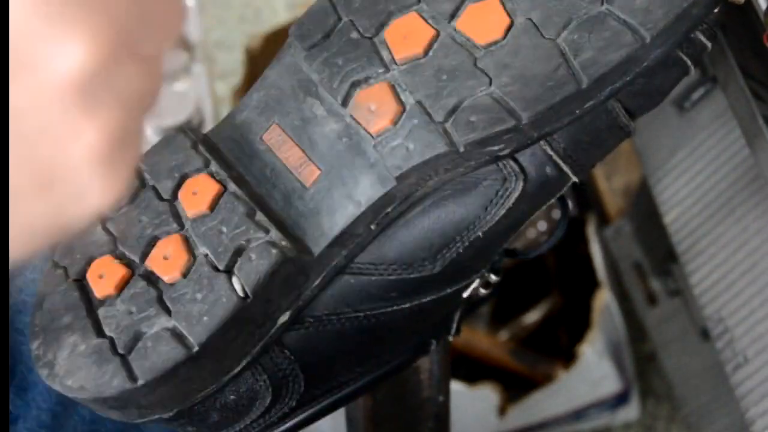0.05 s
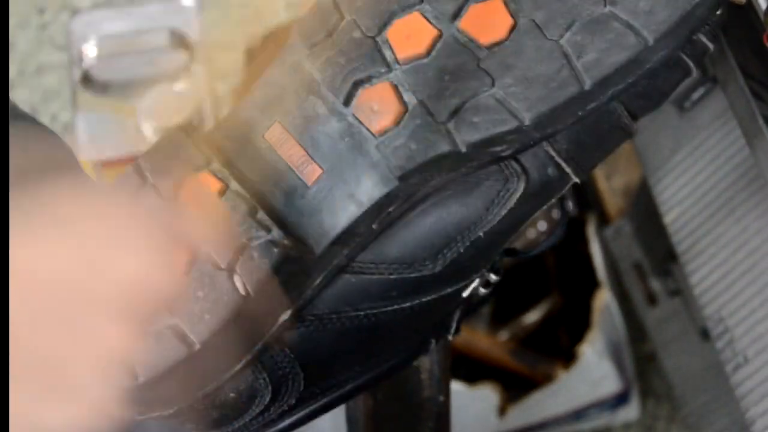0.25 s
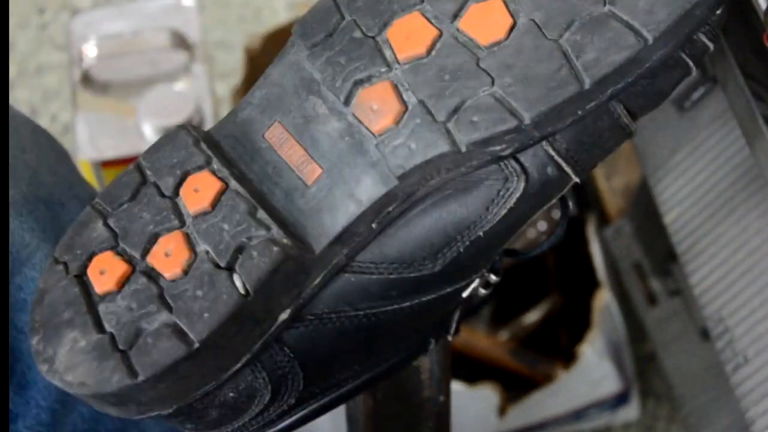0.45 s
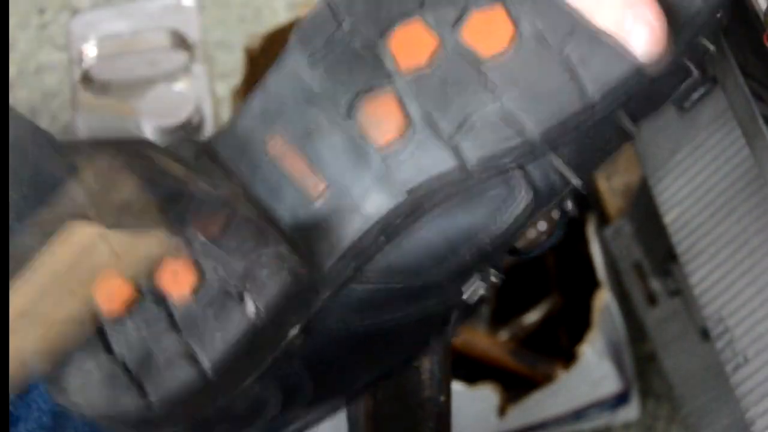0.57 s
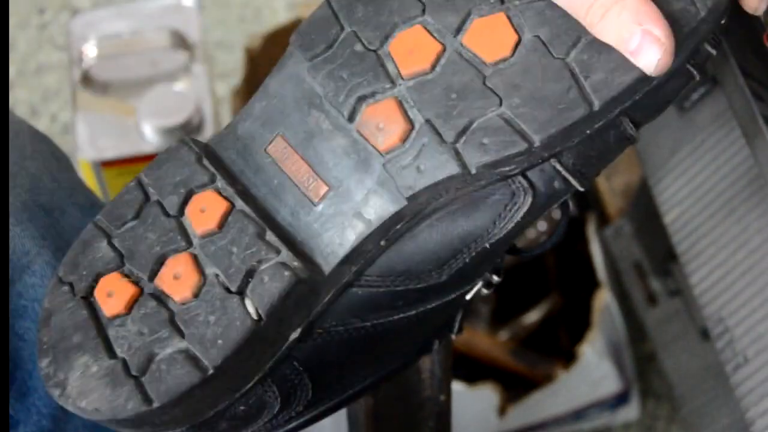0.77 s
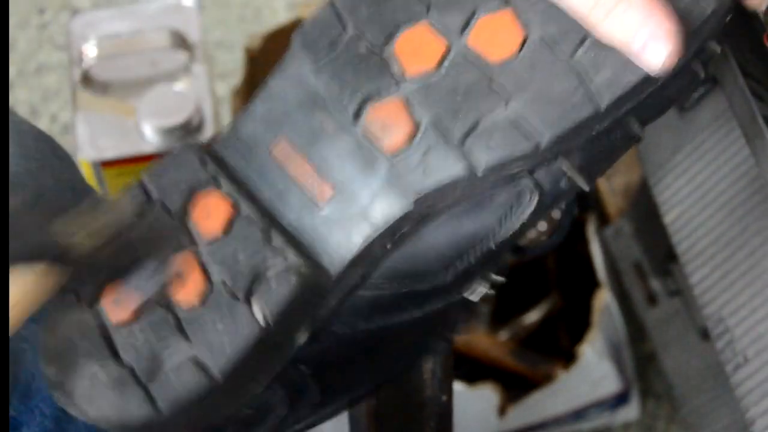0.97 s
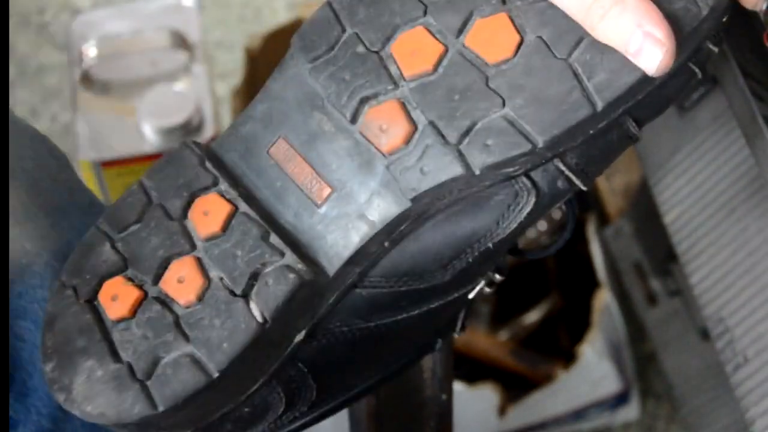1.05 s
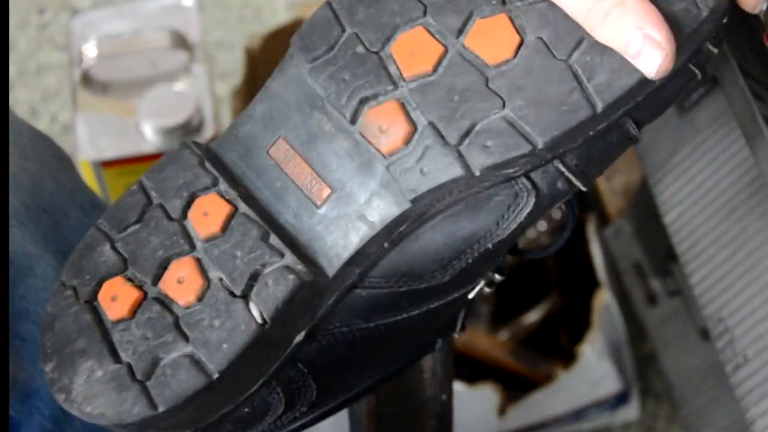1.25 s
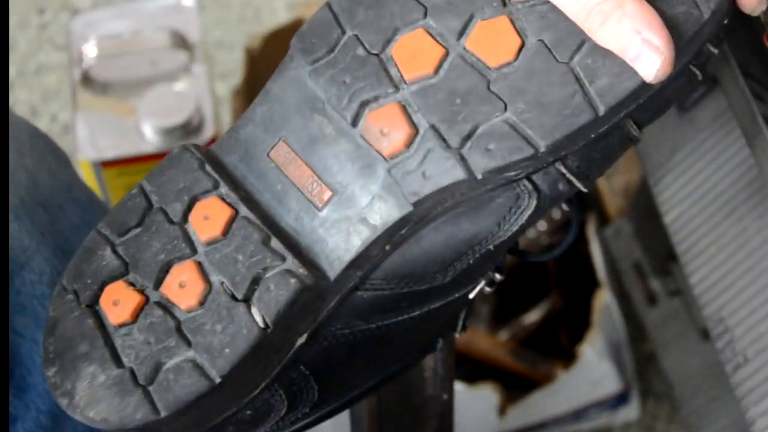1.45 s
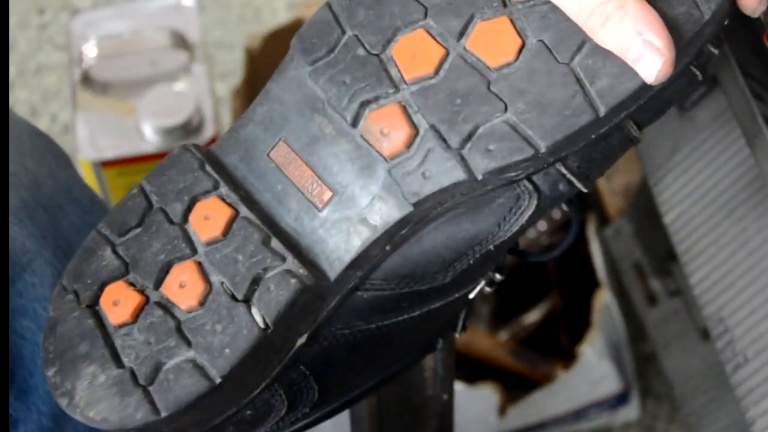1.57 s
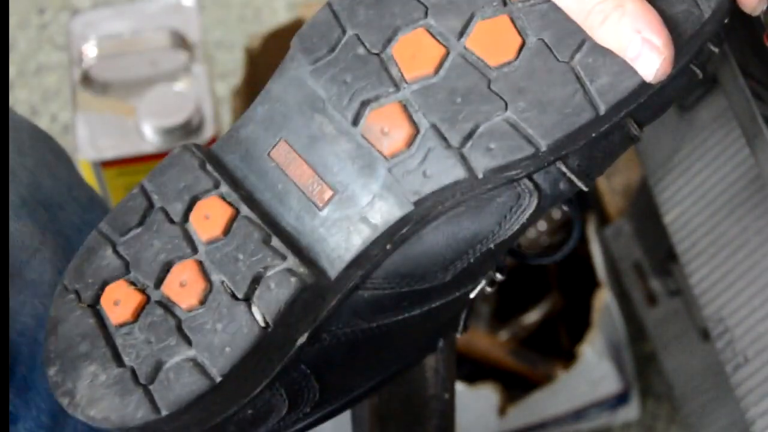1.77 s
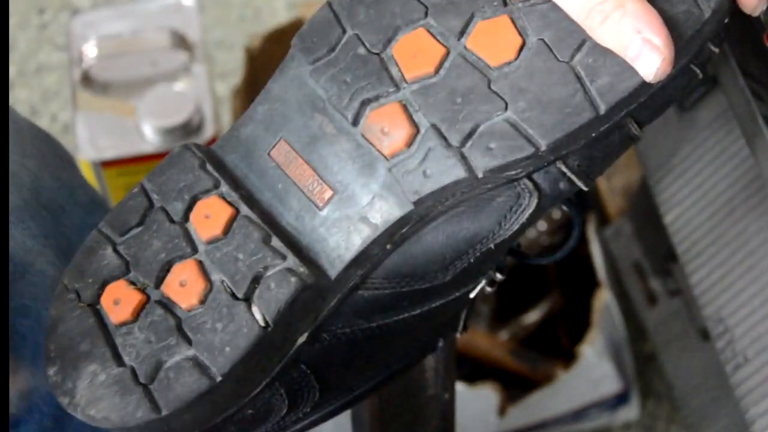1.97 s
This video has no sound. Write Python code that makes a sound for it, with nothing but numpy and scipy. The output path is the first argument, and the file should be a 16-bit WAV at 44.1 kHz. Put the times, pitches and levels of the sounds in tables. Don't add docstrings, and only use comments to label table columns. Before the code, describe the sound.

Hammer blows on a rubber boot sole, five hard clipped knocks in a small shop

```python
import sys
import numpy as np
from scipy import signal
from scipy.io import wavfile
from scipy.ndimage import uniform_filter1d

SR = 44100
rng = np.random.default_rng(int(sys.argv[2]) if len(sys.argv) > 2 else 0)


def wrap_up_sound(samples):
    columns = np.atleast_2d(samples).T
    tamed = np.clip(columns, -1, 1)
    steps = np.round(tamed * 32767).astype(np.int16)
    wavfile.write(sys.argv[1], SR, steps)


def linear_from_db(decibels):
    return 10 ** (np.asarray(decibels, float) / 20)


N = 88200
LEAD = 8820


def evened(x):
    return x / np.sqrt(np.mean(x ** 2) + 1e-20)


def read(points, hz):
    f, value = np.transpose(points)
    return np.interp(np.log(hz + 1), np.log(f + 1), value)


def bump(hz, rows):
    return sum(db * np.exp(-.5 * ((hz - f) / width) ** 2) for f, width, db in rows)


def add(mix, start_s, sound):
    part = mix[LEAD + round(start_s * SR):][:len(sound)]
    part += sound[:len(part)]


def ring(hz, db, t60_s, rise_s, lag_s=0):
    t = np.maximum(np.arange(8000) / SR - lag_s, 0)
    envelope = linear_from_db(db - 60 * t / t60_s) * (1 - np.exp(-t / rise_s))
    return envelope * np.sin(2 * np.pi * hz * t)


def noise(length, size, field_db):
    hop = size / 4
    frames = length * 4 // size + 5
    hz = np.fft.rfftfreq(size, 1 / SR)[:, None]
    real, imag, rough = rng.standard_normal((frames, len(hz), 3)).T
    smooth = uniform_filter1d(rough, size=3, axis=0)
    patches = evened(uniform_filter1d(smooth, size=5, axis=1))
    t = np.arange(frames)[None] * hop / SR
    spectra = (real + 1j * imag) * linear_from_db(field_db(hz, t, patches))
    return signal.istft(spectra, nperseg=size, noverlap=size * 3 // 4)[1][:length]


# frequency in Hz, level in dB.
HUM_SPECTRUM = [(40, -3), (120, 2.5), (200, -13.5), (420, -8), (1100, -18), (4500, -35.5), (11000, -65),
                (15000, -71.5)]


def hum():
    air_db, line_hz, line_db, patch_db = -47.5, 111, -53, 1.8
    air = evened(noise(N, size=2048, field_db=lambda hz, t, p: read(HUM_SPECTRUM, hz) + patch_db * p))
    wander = evened(uniform_filter1d(rng.standard_normal(N), size=3000))
    phase = 2 * np.pi * np.cumsum(line_hz + 3.26 * wander) / SR
    line = (1 + 0.351 * wander) * np.sin(phase)
    return linear_from_db(air_db) * air + linear_from_db(line_db) * line


# start in seconds, level in dB, frequency in Hz, t60 in seconds.
REBOUNDS = [(.2645, -15.5, 2690, 0.091), (.2655, -29, 4720, 0.059), (.283, -22, 525, 0.15),
            (.638, -18.5, 1740, 0.046), (.641, -19.5, 2300, 0.049), (.648, -17, 670, 0.012),
            (1.373, -20.5, 3750, .015), (1.378, -14, 3820, 0.034)]
# start in seconds, level in dB, frequency in Hz, t60 in seconds.
TICKS = [(0.184, -40, 1500, 0.023), (0.184, -51.5, 8300, 0.0036), (.185, -58, 5200, .004),
         (0.226, -45, 1580, 0.079), (.527, -56, 6000, 0.0046), (.565, -67, 6000, .004),
         (.908, -74, 6000, 0.0046)]
# start in seconds, level in dB, frequency in Hz, t60 in seconds.
LINGER = [
    (.64, -47, 7330, .15),
    (-.03, -42, 4750, .22),
    (.64, -46, 6100, .12),
]


def handling(mix_len):
    out = np.zeros(mix_len)
    roughness = .7
    for start_s, db, hz, t60_s in [*REBOUNDS, *TICKS, *LINGER]:
        wobble = evened(np.convolve(rng.standard_normal(8000), np.hanning(90), "same"))
        add(out, start_s, (1 + roughness * wobble) * ring(hz, db, t60_s, t60_s / 30))
    rub_s, rub_len_s, rub_db, rub_hz, rub_width_hz = .57, .02, -65, 5000, 1300
    t = (np.arange(mix_len) - LEAD) / SR
    rub = noise(mix_len, size=256,
                field_db=lambda hz, s, p: -9 * ((hz - rub_hz) / rub_width_hz) ** 2 + 3.4 * p)
    stroke = np.exp(-.5 * ((t - rub_s) / rub_len_s) ** 2)
    return out + linear_from_db(rub_db) * evened(rub) * stroke


# frequency in Hz, level in dB.
TAIL_COLOUR = [(40, -26), (110, 3.5), (300, 0), (800, -2), (1500, -5.5), (3000, -16), (7000, -32),
               (14800, -57)]
# frequency in Hz, width in Hz, level in dB.
IRON_RING = [(3710, 360, 2.5), (4110, 1200, 11), (6600, 350, 3.5)]
# frequency in Hz, width in Hz, depth in dB.
HOUSING_DIPS = [(3150, 200, -4), (5720, 130, -7), (1250, 100, -4)]
# frequency in Hz, t60 in seconds.
SHOP_T60 = [(60, 0.42), (250, 0.42), (700, .3), (2000, 0.31), (4800, 0.29), (9000, 0.34), (14000, 0.1)]


def shop(spot, tail_db, tilt_db_per_oct, echo, iron, stand_hz, stand_db, treble_db):
    echo_widen, stand_width_hz, treble_hz = 1.81, 100, 6000
    early_t60_s, late_db, patch_db, rise_s = .09, -9, 1, .007

    def field(hz, t, patches):
        modes = sum(linear_from_db(db) / (1 + ((hz - f) / (echo_widen * width)) ** 2) for f, width, db in spot)
        colour = read(TAIL_COLOUR, hz) + 20 * np.log10(1 + echo * modes)
        colour = colour + iron * bump(hz, IRON_RING)
        colour = colour + bump(hz, [*HOUSING_DIPS, (stand_hz, stand_width_hz, stand_db)])
        treble = treble_db / (1 + (treble_hz / (hz + 1)) ** 4)
        tilt = tilt_db_per_oct * np.log2(hz / 700 + 0.13)
        early = linear_from_db(-60 * t / early_t60_s) ** 2
        late = linear_from_db(late_db - 60 * t / read(SHOP_T60, hz)) ** 2
        return colour + treble + tilt + 10 * np.log10(early + late) + patch_db * patches

    tail = noise(24000, size=512, field_db=field)
    t = np.arange(len(tail)) / SR
    return linear_from_db(tail_db) * tail / np.std(tail[:2000]) * (1 - np.exp(-(t / rise_s) ** 2))


# frequency in Hz, level in dB, t60 in seconds.
FACE = [(1500, 6, 0.006), (2300, 0.5, 0.0031), (3750, 11, 0.0055), (4317, -5, 0.0081), (5940, 4.5, 0.002),
        (7590, 0, 0.0017), (11660, -18, 0.0037)]


def strike(spot, sole_db, face_db, push_db, damp_s, bright_db_per_oct, lag_s):
    push_s, rise_cycles, widen = 0.00039, 0.54, 0.99
    sole = sum(ring(hz, db, 1.47 / (widen * width), rise_cycles / hz, lag_s) for hz, width, db in spot)
    t = np.arange(len(sole)) / SR
    sole *= np.exp(-(t / damp_s) ** 3)
    face = sum(ring(hz, db + bright_db_per_oct * np.log2(hz / 3000), t60_s, .00008, push_s / 2)
               for hz, db, t60_s in FACE)
    push = linear_from_db(push_db) * np.sin(np.pi * np.minimum(t / push_s, 1))
    return push - linear_from_db(face_db) * face / abs(face).max() - linear_from_db(sole_db) * sole / abs(sole).max()


# frequency in Hz, width in Hz, level in dB.
SPOT_A = [(122, 13.4, -10), (229, 23, -15), (455, 49, 8.5), (560, 160, -5), (1030, 170, -6),
          (1298, 48, -12), (1385, 86, -5), (1630, 69, -9.5)]
SPOT_B = [(128, 13, -7.5), (377, 60, 5), (615, 92, -18.5), (668, 34, -5.5), (1070, 43, -6.5),
          (1920, 260, -19), (2300, 150, -6), (2990, 450, 6)]
SPOT_C = [(117, 13, -10.5), (364, 40, 0.5), (864, 91, 9), (1180, 110, -9.5), (1528, 120, -7),
          (1860, 43, -9), (2630, 140, -3.5), (3458, 140, -6.5)]
SPOT_D = [(130, 20, -5.5), (204, 29, 1.5), (388, 59, 5.5), (770, 63, 2.5), (1011, 60, 4), (1520, 330, -7.5),
          (1940, 43, -9.5), (4070, 91, -6)]
SPOT_E = [(120, 13, -10.5), (238, 20, 2), (394.4, 44, 11.5), (766, 27, 3.5), (992, 80, 13.5),
          (1730, 100, -11), (2030, 43, 3.5), (3410, 167, -12)]
# start in seconds, sole in dB, hammer face in dB, shop tail in dB,
# tail brightness in dB per octave.
BLOWS = [
    (-.085, 27, -4, -15.5, 3),
    (.2481, 5.5, -6, -9, 2.5),
    (.6243, 1.5, -8, -16, 1),
    (0.9985, 7.5, 7, -11, 0.5),
    (1.3645, 6, 10, -12.5, 0),
    (1.7157, 6.5, 1, -15, -0.5),
]
# push in dB, sole damping time in seconds, face brightness in dB per octave,
# sole lag in seconds.
CONTACT = [(0, .011, 0, .001), (2.5, 0.015, 11.5, 0.001056), (1.5, .013, 6.5, .001),
           (3.5, 0.023, -3, 0.001054), (-0.5, 0.0081, 2, 0.00064), (0, 0.011, 0, 0.001048)]
# sole echo from 0 to 2, iron from 0 to 2, stand in Hz, stand in dB, treble in dB.
RING_SHARE = [(.4, 0.86, 660, 6, -5.5), (.6, .3, 590, 12.5, -1.5), (.4, .3, 667, 3, -4),
              (0.401, 1.26, 830, 2.5, 2), (.4, 1.5, 700, 5.5, 6.5), (0.401, 0.82, 714, 5.5, 3)]


def scene():
    mix = handling(N + LEAD)
    spots = [SPOT_E, SPOT_A, SPOT_B, SPOT_C, SPOT_D, SPOT_E]
    for blow, spot, share, contact in zip(BLOWS, spots, RING_SHARE, CONTACT):
        start_s, sole_db, face_db, tail_db, tilt_db_per_oct = blow
        add(mix, start_s, strike(spot, sole_db, face_db, *contact))
        add(mix, start_s, shop(spot, tail_db, tilt_db_per_oct, *share))
    mic_low_hz = 97
    mix = signal.sosfilt(signal.butter(2, mic_low_hz, "high", fs=SR, output="sos"), mix)
    return (mix[LEAD:] + hum())[None]


def low_pass(x):
    return signal.sosfilt(signal.butter(12, 15000, fs=SR, output="sos"), x)


def record(dry):
    clip_level, edge_hz = .98, 14200
    flat = np.clip(dry, -clip_level, clip_level)
    band = signal.oaconvolve(flat, signal.firwin(81, edge_hz, fs=SR)[None], "same")
    return low_pass(band)


dry = scene()
out = record(dry)
wrap_up_sound(out)
```